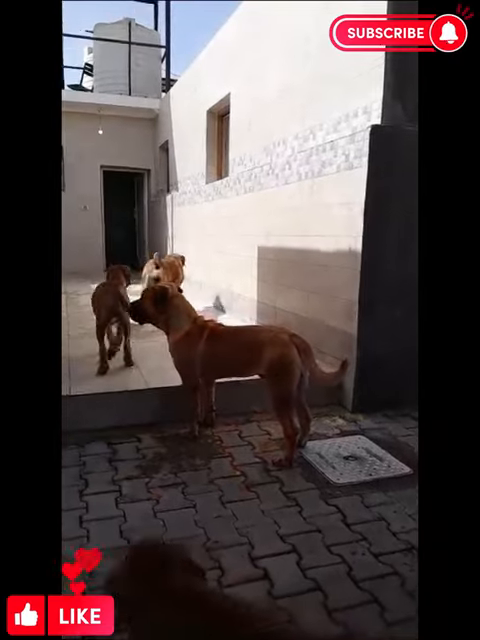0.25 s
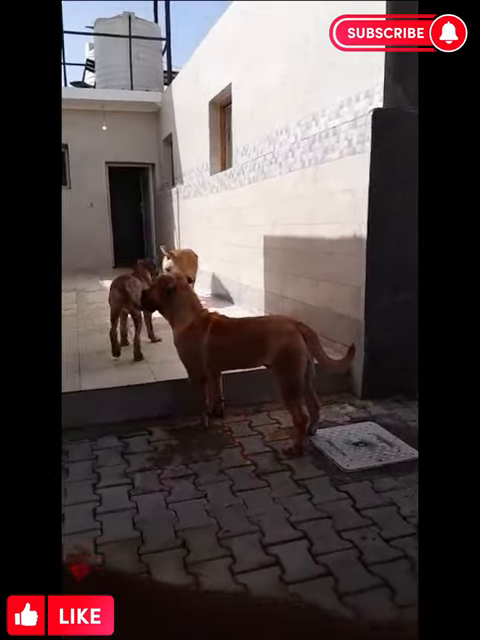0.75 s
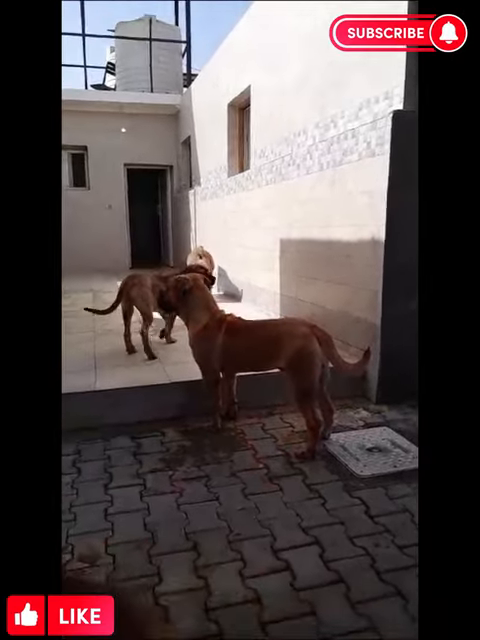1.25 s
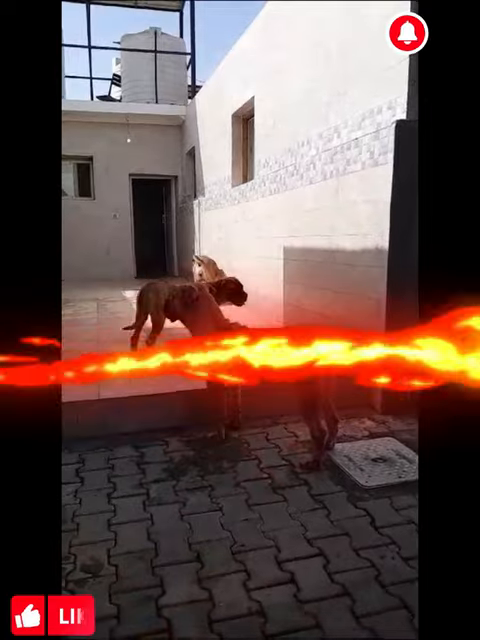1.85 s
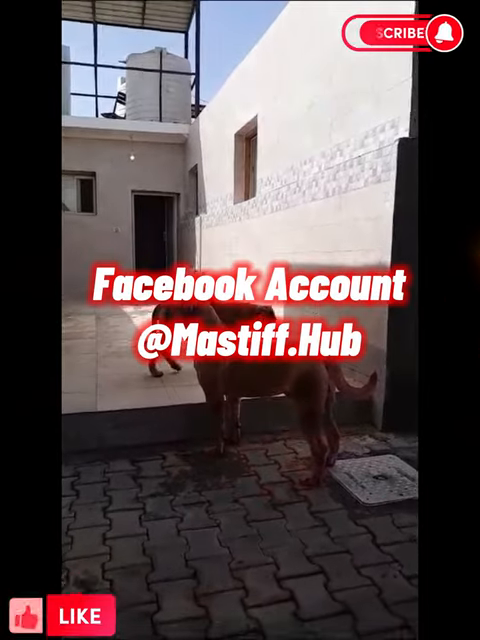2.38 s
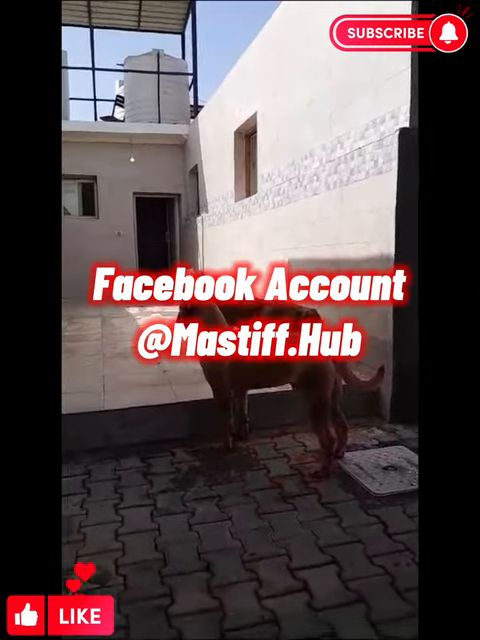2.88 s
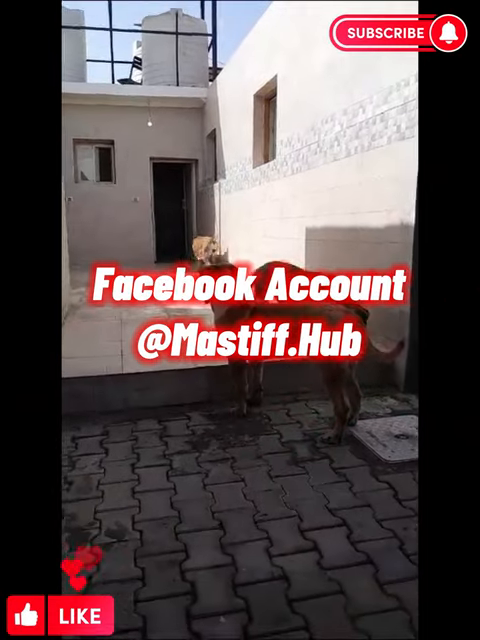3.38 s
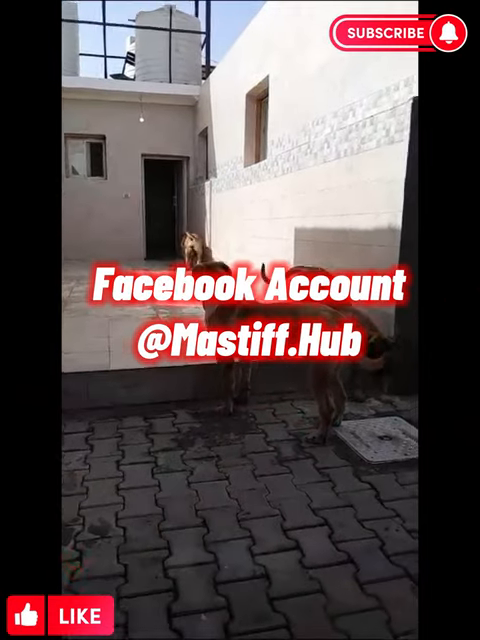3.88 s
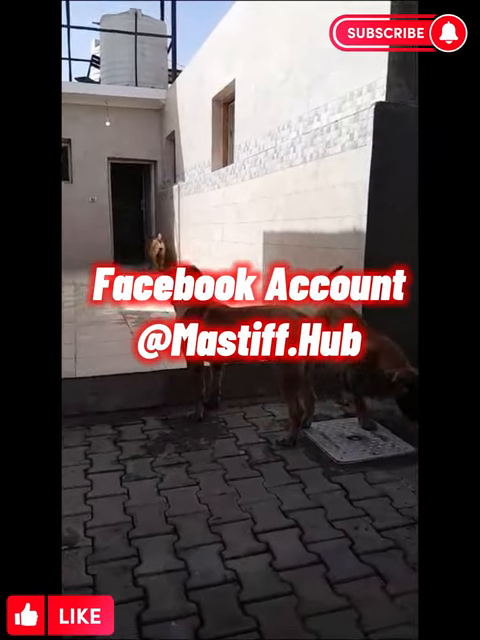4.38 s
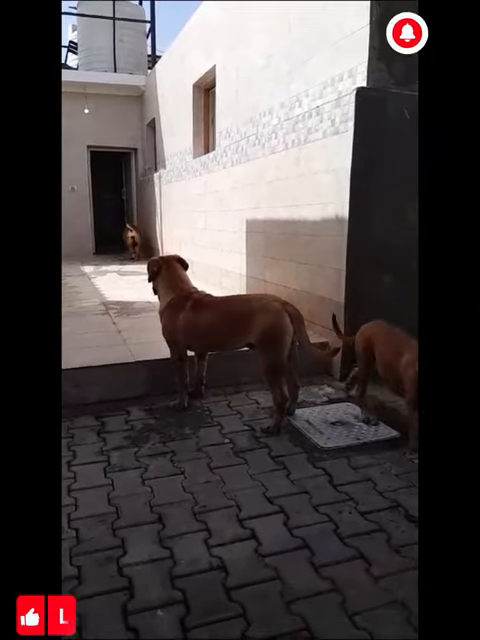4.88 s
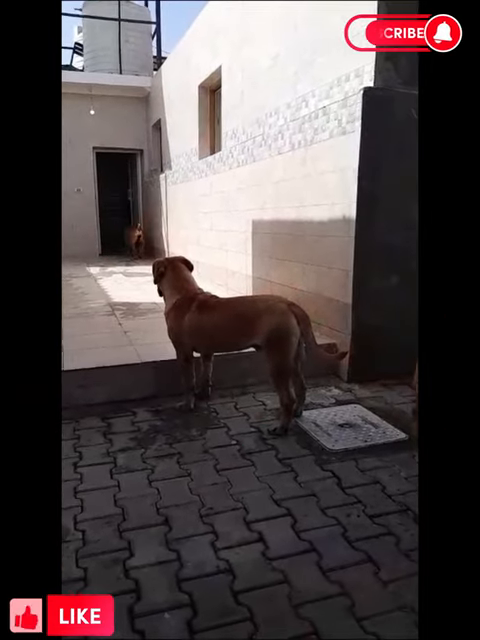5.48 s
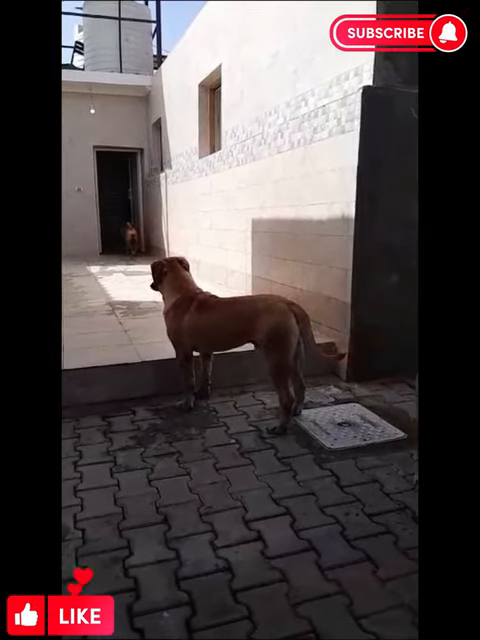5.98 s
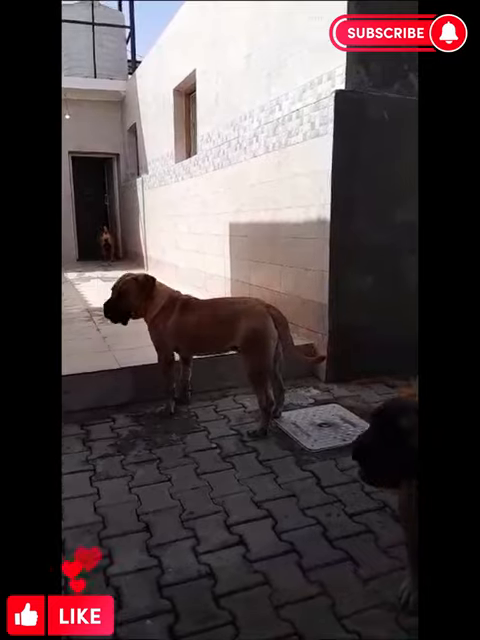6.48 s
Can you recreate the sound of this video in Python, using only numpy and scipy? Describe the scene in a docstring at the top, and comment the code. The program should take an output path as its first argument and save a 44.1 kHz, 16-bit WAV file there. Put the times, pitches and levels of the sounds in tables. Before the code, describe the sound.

After over a second of low wind buffets and handling rustles, a large nearby dog gives one harsh bark. A gruff low woof follows, then rounder, echoing barks from a dog at the far end. A bird chatters in fast rasping notes through the middle. Two chesty close barks come late, with another distant answer between hard walls.

```python
"""Dogs barking in a courtyard

Two big dogs bark nearby, hoarse; one answers from the far end: fold pulses and breath noise through a throat.
Echoes and a diffuse tail of the walled, paved yard follow. A bird chatters in short rasping noise bursts,
paws scuff the paving, air buffets the two microphone ports and a hand rustles on the casing.
Faint calls, an outdoor hush and far chirring are shaped noise."""
import sys
import numpy as np
from scipy import signal
from scipy.fft import rfft, irfft
from scipy.io import wavfile
from scipy.ndimage import uniform_filter1d

SR = 44100
rng = np.random.default_rng(int(sys.argv[2]) if len(sys.argv) > 2 else 0)


def to_wav(s):
    """Save 16-bit WAV."""
    ch = np.atleast_2d(s).T  # columns
    pcm = np.round(np.clip(ch, -1, 1) * 32767)  # PCM
    wavfile.write(sys.argv[1], SR, pcm.astype(np.int16))


N = 297224
TIME = np.arange(N) / SR


def gain_of(db):
    """Decibels to amplitude."""
    return 10 ** (np.asarray(db) / 20)


def evened(x):
    """Scaled to rms 1."""
    return x / np.sqrt(np.mean(x ** 2) + 1e-20)


def read(points, hz):
    """A spectrum table interpolated on a log-frequency axis."""
    table_hz, value = np.transpose(points)
    return np.interp(np.log(hz + 1), np.log(table_hz + 1), value)


def follow(rows, t):
    """Each column of a curve table at times t."""
    s, *columns = np.transpose(rows)
    return [np.interp(t, s, column) for column in columns]


def add(mix, s, sound):
    """Mixes a sound in at time s, cut at the end of the mix."""
    part = mix[..., max(round(s * SR), 0):][..., :sound.shape[-1]]
    part += sound[..., :part.shape[-1]]


def noise(colour):
    """Two unrelated channels of noise, coloured in the spectrum."""
    spectrum = rfft(rng.standard_normal((2, N)))
    shape = gain_of(read(colour, np.fft.rfftfreq(N, 1 / SR)))
    return evened(irfft(spectrum * shape, N))


def wander(n, hz):
    """Random curve of rms 1: straight lines between hz random points per second."""
    return evened(np.interp(np.arange(n) * hz / SR, np.arange(4096), rng.standard_normal(4096)))


def resonate(x, hz, width):
    """A steep moving resonance: shift hz down to zero, smooth twice, shift back."""
    turn = np.exp(2j * np.pi * np.cumsum(hz * np.ones(len(x))) / SR)
    r = np.exp(-np.pi * width / SR)
    smooth = signal.lfilter([(1 - r) ** 2], [1, -2 * r, r * r], x / turn + 1e-18)
    return 2 * (turn * smooth).real


def near_dogs():
    """One dog gives a harsh, wide-mouthed bark; another a gruff woof and two chesty barks."""
    # (start [s], rise [s], hold [s], fall [s], effort [dB], base pitch [Hz], roughness [0-1],
    #  throat frequency factor, brightness [dB/octave], flutter depth per unit roughness)
    near_barks = [(1.666, 0.035, 0.045, 0.049, -15.5, 225.9, 0.41, 0.996, 0.5, 0.41),
                  (2.578, 0.06, 0.059, 0.07, -29, 104.2, 0.59, 0.992, -1, 0.72),
                  (5.464, .062, .022, .062, -14.5, 209.3, 0.38, 1.05, 1.5, 0.57),
                  (6.089, 0.0722, 0.0117, 0.0614, -19, 178.7, 0.46, 1.05, 0.5, 0.59)]
    # throat resonances: (frequency [Hz], width [Hz], level [dB])
    harsh_throat = [(190, 127, -8), (445, 220, -2.5), (695, 214, 1), (867, 190, -8.5), (1110, 230, -6.5),
                    (1424, 340, -22.5), (2255, 120, -15), (2640, 180, -15), (4950, 470, -25),
                    (5200, 1700, -27), (12400, 3400, -37)]
    gruff_throat = [(205, 90, 2), (352, 170, -0.5), (705, 130, -3), (1090, 250, -9), (2350, 420, -20.5),
                    (3030, 400, -17.5), (5350, 2200, -27), (12400, 11000, -42.5)]
    chesty_throat = [(196, 240, -8.5), (481, 147, 2), (677, 240, -1.5), (871, 200, -8.5), (1110, 130, -10),
                     (1430, 360, -19), (2150, 610, -23), (2583, 150, -20), (5240, 1470, -26.5),
                     (7160, 1100, -39), (12600, 13000, -46)]
    # offsets from the peak at the two ends of a bark: (effort [dB], share of pitch, roughness,
    #  share of throat factor, brightness [dB/octave])
    near_start = (-23, -0.2, -0.07, 0.51, -9)
    near_end = (-14, 0.41, -0.02, -0.61, -1.5)
    throats = [harsh_throat, gruff_throat, chesty_throat, chesty_throat]
    courses = [gesture(row, near_start, near_end, glide_hz_per_s=0) for row in near_barks]
    voices = [bark(course, throat, jitter=.2, doubling=0.44, throb_hz=46.2, chest_hz=118)
              for course, throat in zip(courses, throats)]
    heard = courtyard(sum(voices), lead_s=0.00022, balance_db=2.0, walls_db=2.5, tail_db=-5.5, build_s=0.002)
    return gain_of(3.0) * scattered(heard, above_hz=1250, turn_rad=1.5)


def far_dog():
    """Rounder barks from the far end, with much more of the yard in them."""
    # (start [s], rise [s], hold [s], fall [s], effort [dB], base pitch [Hz], roughness [0-1],
    #  throat frequency factor, brightness [dB/octave], flutter depth per unit roughness)
    far_barks = [(2.864, .065, .035, .080, -19, 291.5, 0.47, 1.05, 1.5, .2),
                 (3.599, .062, 0.0689, 0.058, -23.5, 281.1, 0.5, .99, 1, 1.86),
                 (6.237, 0.031, 0.039, .085, -23, 278.4, .32, 1, 1, 0.79)]
    # throat resonances: (frequency [Hz], width [Hz], level [dB])
    far_throat = [(350, 86.6, 4.5), (490, 110, 4), (557, 118, -3.5), (817, 47, -7), (902, 66, -17),
                  (1636, 77, -29.5), (2720, 440, -46.5), (3350, 250, -45), (4300, 380, -46.5)]
    # offsets from the peak at the two ends of a bark: (effort [dB], share of pitch, roughness,
    #  share of throat factor, brightness [dB/octave])
    far_start = (-21, 0.32, -0.9, 0.7, -9)
    far_end = (-13, -0.02, 0.01, 0.29, 2.5)
    courses = [gesture(row, far_start, far_end, glide_hz_per_s=220) for row in far_barks]
    voices = [bark(course, far_throat, jitter=.12, doubling=0.59, throb_hz=42.97, chest_hz=220)
              for course in courses]
    heard = courtyard(sum(voices), lead_s=0, balance_db=0.4, walls_db=9.5, tail_db=1, build_s=0.011)
    return gain_of(-0.5) * heard


def gesture(row, at_start, at_end, glide_hz_per_s):
    """The course of a bark: effort, pitch, roughness, throat and brightness reach a peak, hold and move off."""
    start, rise, hold, fall, db, hz, rough, mouth, bright_db, throb = row
    t = np.arange(0, rise + hold + fall, 1 / SR)
    opening = np.clip(1 - t / rise, 0, 1) ** 2
    closing = np.clip((t - rise - hold) / fall, 0, 1)
    offsets = np.outer(at_start, opening) + np.outer(at_end, closing)
    fade_db, bend, rasp, jaw, tilt_db = offsets
    pitch = hz * (1 + bend) + glide_hz_per_s * t
    roughness = np.clip(rough + rasp, 0, 1)
    return start + t, db + fade_db, pitch, roughness, mouth * (1 + jaw), bright_db + tilt_db, throb


def bark(course, throat, jitter, doubling, throb_hz, chest_hz):
    """Unsteady fold pulses and puffs of breath excite moving throat resonances."""
    t, effort_db, hz, rough, mouth, bright_db, throb = course
    turns = np.cumsum(hz * (1 + jitter * rough * wander(len(t), 250.5))) / SR
    orders = np.arange(1, 20)[:, None]
    folds = (np.cos(2 * np.pi * orders * turns) * np.exp(-orders / 9)).sum(0)
    puffs = (.7 + np.exp(-(turns % 1) / .4)) * rng.standard_normal(len(t))  # strongest at each pulse
    drive = (1 - rough) * evened(folds) + 3 * rough * evened(puffs)
    drive *= 1 + doubling * np.cos(np.pi * turns)  # strong and weak pulses alternate
    voice = np.zeros(len(t))
    for f, width, db in throat:
        tilt_db = bright_db * np.log2(min(f, 2500) / 500)
        voice += gain_of(db + tilt_db) * resonate(drive, f * mouth, width)
    # a mouth radiates little deep bass
    voice = signal.sosfilt(signal.butter(2, chest_hz, 'high', fs=SR, output='sos'), voice)
    voice /= np.sqrt(uniform_filter1d(voice ** 2, size=700) + 1e-12)  # leave the loudness to effort
    # loose tissue flaps in rough stretches
    flutter = 1 + throb * rough * np.cos(2 * np.pi * throb_hz * (t - t[0] - .005))
    track = np.zeros(N)
    add(track, t[0], gain_of(effort_db) * voice * flutter * signal.windows.tukey(len(t), .1))
    return track


def courtyard(x, lead_s, balance_db, walls_db, tail_db, build_s):
    """Direct sound, first reflections and diffuse tail."""
    # reflections off paving and walls: (delay [s], gain before walls_db, lead of the left port [s])
    walls = [(.0034, 0.16, .0002), (0.0122, 0.18, -.0003), (0.047, .1, -.0001)]
    direct = arrive(x, 0, lead_s) * gain_of([[balance_db / 2], [-balance_db / 2]])
    echoes = sum(gain * arrive(x, delay, side) for delay, gain, side in walls)
    return direct + gain_of(walls_db) * echoes + gain_of(tail_db) * reverberate(x, build_s)


def arrive(x, delay_s, lead_s):
    """A sound reaching both ports after a delay, the left one earlier by lead_s."""
    lags = (0, round(lead_s * SR) / SR)
    return np.array([np.interp(TIME - delay_s - lag, TIME, x, left=0) for lag in lags])


def reverberate(x, build_s, port_gap_m=0.12):
    """Diffuse tail between the walls: noise decaying per band; the two ports hear its bass alike."""
    # decay time of the yard: (frequency [Hz], t60 [s])
    yard = [(120, 0.75), (300, 0.89), (600, 0.81), (1100, 0.71), (2300, 0.54), (5000, 0.51), (12000, 0.67)]
    hz, t, z = signal.stft(rng.standard_normal((2, SR)), SR, nperseg=512)
    same = np.sinc(2 * hz * port_gap_m / 343)[:, None]  # coherence in a diffuse field
    z = np.array([z[0], same * z[0] + np.sqrt(1 - same ** 2) * z[1]])
    z *= gain_of(-60 * t / read(yard, hz)[:, None])
    z *= 1 - np.exp(-t / build_s)
    z /= np.linalg.norm(z, axis=2, keepdims=True)  # hard walls return all bands equally
    tail = signal.istft(z, SR, nperseg=512)[1]
    return signal.fftconvolve(x[None], tail / np.linalg.norm(tail[0]), axes=1)[:, :N]


def scattered(ports, above_hz, turn_rad):
    """Nearby surfaces twist the phase of the treble differently at each port."""
    hz = np.fft.rfftfreq(N, 1 / SR)
    twist = np.array([np.interp(hz, np.arange(80) * 300, rng.standard_normal(80)) for _ in ports])
    onset = np.clip(2 * (hz / above_hz - 1), 0, 1)
    return irfft(rfft(ports) * np.exp(1j * turn_rad * twist * onset), N)


def bird():
    """Runs of short notes, each rasping noise in bands that slide down a little."""
    # (phrase start [s], phrase end [s], note spacing [s])
    phrases = [(3.483, 4.8, .0714), (4.84, 5.5, .079), (5.548, 6.0, .082), (6.34, 6.62, .082)]
    # (time [s], mean level [dB], mean centre [Hz])
    chatter = [(3.47, -67, 4900), (4, -59, 5100), (4.5, -57, 5300), (5.05, -51, 5650), (5.3, -53, 5900),
               (5.85, -49, 5900), (6.6, -59, 6000)]
    # bands of a note: (multiple of the centre, width [Hz], level [dB])
    beak = [(1, 1050, 0), (.82, 1100, -6), (.56, 900, -10)]
    voice = np.zeros(N)
    u = np.linspace(0, 1, int(.05 * SR))  # 50 ms note
    glide = 1.04 - .14 * u
    for s in np.concatenate([np.arange(*phrase) for phrase in phrases]):
        db, hz = follow(chatter, s)
        rasp = rng.standard_normal(len(u))
        hz = hz * rng.uniform(.95, 1.05)
        note = sum(gain_of(band_db) * resonate(rasp, k * hz * glide, width) for k, width, band_db in beak)
        swell = np.sin(np.pi * np.sqrt(u))
        add(voice, s, gain_of(db + 2 * rng.normal()) * evened(note * swell))
    heard = arrive(voice, 0, 0) + gain_of(-6) * reverberate(voice, build_s=.01)
    return gain_of([[-.5], [.5]]) * scattered(heard, above_hz=1400, turn_rad=1.3)


def paws():
    """Soft, gritty scuffs on the paving: swells of noise with a flickering level."""
    # (start [s], level [dB], length [s])
    scuffs = [(0, -59, 0.064), (1.202, -56, 0.13), (4.704, -53, 0.11), (6.666, -52, 0.099)]
    # (frequency [Hz], relative density [dB per Hz])
    scuff_colour = [(200, -19), (600, 0.5), (950, 5), (1600, -9.5), (2800, -5.5), (4500, -24.5),
                    (10000, -38)]
    level = np.zeros(N)
    for s, db, length in scuffs:
        add(level, s, gain_of(db) * np.hanning(int(length * SR)))
    grit = level * noise(scuff_colour)[0] * gain_of(2 * wander(N, 300))
    return courtyard(grit, lead_s=0, balance_db=3.5, walls_db=-38, tail_db=-4.5, build_s=0.0056)


def rustles(rise_s=0.007):
    """Each slip of the hand is a tiny tick and a grainy hiss that dies away."""
    # (start [s], nominal level [dB], t60 [s], left-right difference [dB])
    slips = [(0.042, -49, 0.036, 13), (.28, -59, 0.099, 6), (.423, -46, 0.3, 3), (.628, -50.5, 0.12, 13),
             (.903, -49.5, 0.25, 1), (1.1235, -54, 0.12, 22), (1.424, -53.5, 0.98, 5.5),
             (2.007, -53.5, .1, 14.5), (2.18, -56, 0.07, 13), (2.4593, -47.5, 0.4, 1.5),
             (3.211, -42, 0.19, 4), (3.3632, -47, 0.23, 9), (4.5265, -56.5, 0.2, 13.5),
             (4.7274, -50.5, 0.19, 10), (5.2997, -39.5, .11, 8.5), (5.673, -49, 0.3, 9),
             (6.5027, -41.5, 0.16, 5)]
    # (frequency [Hz], relative density [dB per Hz])
    rustle_colour = [(500, -16.5), (1500, -3), (3000, -2), (5500, 0.5), (8500, -0.5), (12500, 2.5),
                     (15500, 1.5)]
    level, t = np.zeros((2, N)), np.arange(SR // 2) / SR
    for s, db, t60, side_db in slips:
        hiss = gain_of(-60 * t / t60) * (1 - np.exp(-t / rise_s))
        tick = np.exp(-t / .002)
        stroke = gain_of(-3) * hiss + gain_of(-9) * tick
        add(level, s, gain_of([[db + side_db / 2], [db - side_db / 2]]) * stroke)
    grip = gain_of([[-67], [-77]]) * gain_of(3 * wander(N, 12))  # the hand is never quite still
    return (level + grip) * noise(rustle_colour) * gain_of(2.2 * wander(N, 500))


def wind(left_db=0, right_db=-1, lumps_db=3.5, gust_edge_db=-6.5):
    """Lumpy low buffeting, unrelated at the two ports: gusts swell and fade over a light breeze."""
    # (middle [s], length [s], left level [dB], right level [dB])
    gusts = [(0.28, 0.13, -36.5, -39.5), (0.442, 0.13, -24.5, -62), (1.08, 0.29, -45.5, -37.5),
             (1.453, 0.11, -40, -67), (2.007, 0.2, -35.5, -62), (2.235, 0.11, -36.5, -73),
             (2.502, 0.18, -39, -43), (2.654, 0.11, -31, -50), (2.972, 0.13, -32, -56),
             (3.146, .12, -41, -26), (3.24, .13, -30.5, -28), (4.15, 0.081, -57, -44.5),
             (4.645, 0.12, -38, -69), (5.123, 0.21, -34, -40.5), (5.487, 0.28, -39, -33.5),
             (6.19, 0.47, -43, -44)]
    # air between the gusts: (time [s], level [dB])
    breeze = [(0, -39), (.5, -47), (.7, -66), (.9, -46.5), (2.2, -58.5), (3.6, -43.5), (4.45, -63.5),
              (4.8, -47), (5.9, -53), (6.73, -50)]
    # (frequency [Hz], relative density [dB per Hz])
    buffet = [(20, -27.5), (38, -12), (58, 0), (85, -2), (125, -11), (190, -25.5), (300, -31), (700, -77)]
    t = TIME[::100]
    power = gain_of(follow(breeze, t)[0] + np.array([[left_db], [right_db]])) ** 2
    for s, length, *ports_db in gusts:
        swell = gain_of(gust_edge_db * (2 * (t - s) / length) ** 2)
        power = power + np.outer(gain_of(ports_db), swell) ** 2
    level = np.array([np.interp(TIME, t, np.sqrt(port)) * gain_of(lumps_db * wander(N, 22)) for port in power])
    eddies = noise(buffet)
    eddies /= np.sqrt(uniform_filter1d(eddies ** 2, size=4000))  # leave the slow level to the curves
    return level * eddies * np.minimum(TIME / .01, 1)  # 10 ms fade-in


def far_calls(width_hz=130):
    """A few thin, blurred animal calls from beyond the walls: narrow noise bands."""
    # (start [s], length [s], level [dB], pitch [Hz])
    calls = [(0.635, 0.099, -64, 810), (4.759, 0.08, -63, 1065), (4.871, 0.061, -60.5, 1090),
             (4.98, 0.085, -64, 1056), (5.242, 0.069, -60.5, 1090)]
    voice = np.zeros(N)
    for s, length, db, hz in calls:
        swell = np.hanning(int(length * SR))
        tone = evened(resonate(rng.standard_normal(len(swell)), hz, width_hz))
        add(voice, s, gain_of(db) * swell * tone)
    return arrive(voice, 0, 0) + gain_of(-2.5) * reverberate(voice, build_s=0.012)


def outdoors():
    """A quiet hush of coloured noise with far birds chirring in a band around 4 kHz."""
    # (frequency [Hz], relative density [dB per Hz])
    hush_colour = [(88, -27), (150, -4.5), (339, -9), (428, -13), (561, -7.5), (1370, -19), (2600, -22.5),
                   (3980, -15), (7130, -32.5), (12500, -29.5), (15500, -34)]
    # (time [s], hush level [dB], chirring level [dB])
    distance = [(0, -65.5, -77), (1.4, -63.5, -72), (2.3, -67.5, -84), (4.4, -66, -69.5), (5.2, -57, -62),
                (6.7, -57.5, -72.5)]
    hush_db, chirr_db = follow(distance, TIME)
    chirr = evened(np.array([resonate(side, 4000, 1800) for side in rng.standard_normal((2, N))]))
    hush = gain_of(hush_db + wander(N, 14)) * noise(hush_colour)
    return hush + gain_of(chirr_db + 2 * wander(N, 4.7)) * chirr


def scene():
    """Everything heard in the yard."""
    dogs = near_dogs() + far_dog()
    # some metal in the yard rings faintly with the barks
    ring = gain_of(-8) * np.array([resonate(side, 1701, 3) for side in dogs])
    return dogs + ring + bird() + far_calls() + rustles() + paws() + wind() + outdoors()


def record(dry, edge_hz=15750):
    """The loudest peaks are rounded off; then a low-pass sets the band limit."""
    rounded = dry / (1 + (dry / .95) ** 6) ** (1 / 6)
    low_pass = signal.firwin(511, edge_hz, window=("kaiser", 9), fs=SR)
    return signal.oaconvolve(rounded, low_pass[None], "same")


dry = scene()
out = record(dry)
to_wav(out)
```